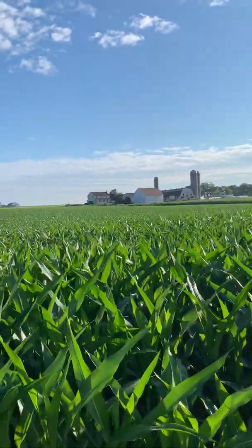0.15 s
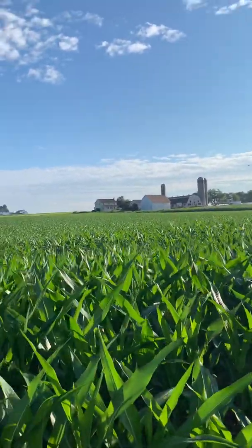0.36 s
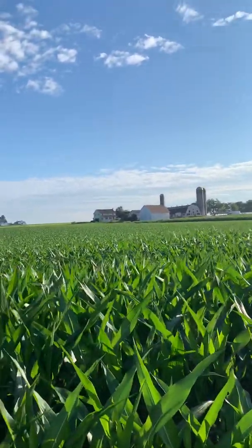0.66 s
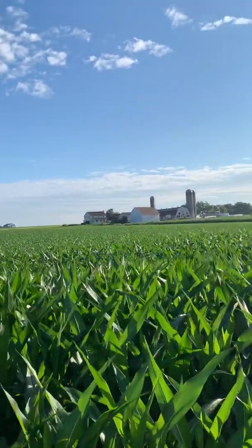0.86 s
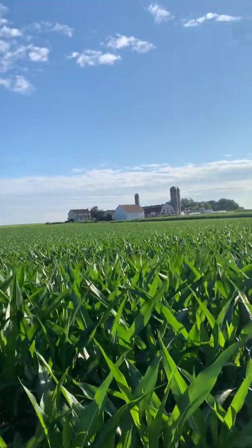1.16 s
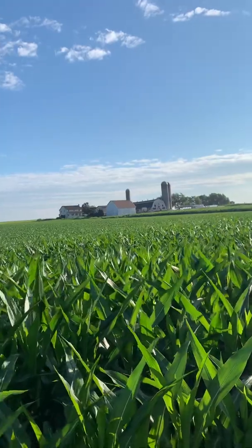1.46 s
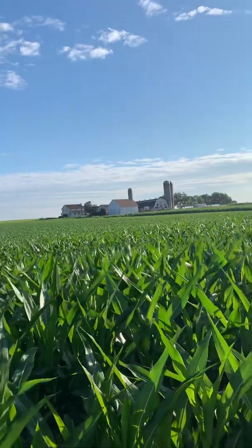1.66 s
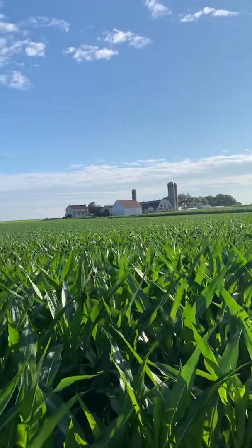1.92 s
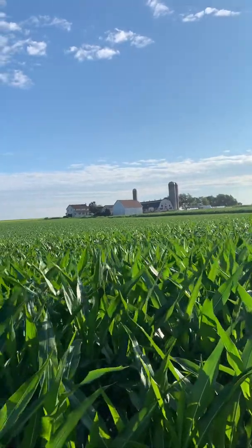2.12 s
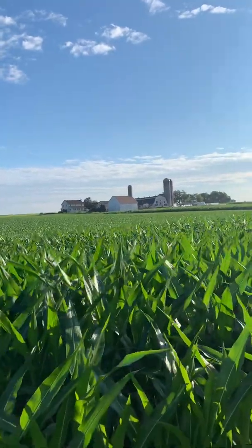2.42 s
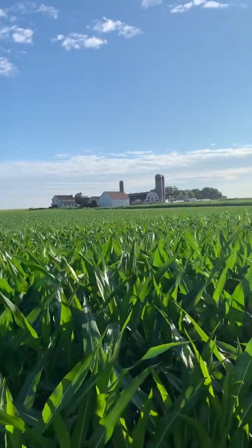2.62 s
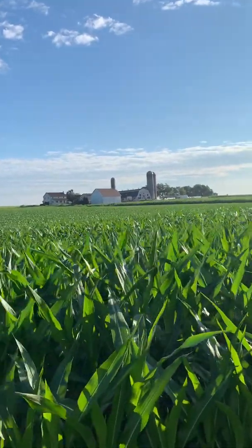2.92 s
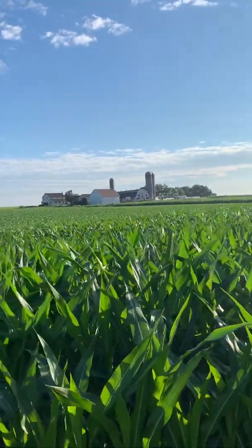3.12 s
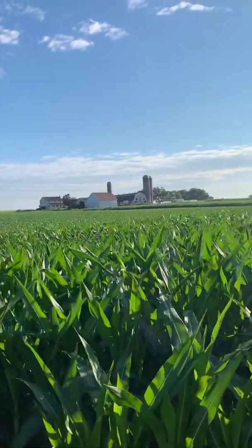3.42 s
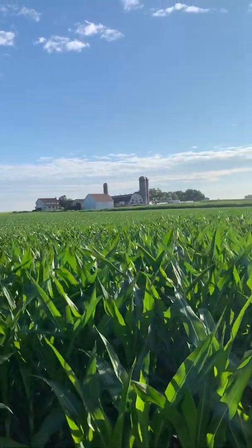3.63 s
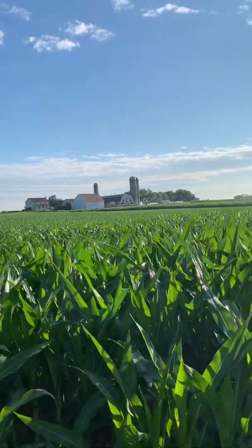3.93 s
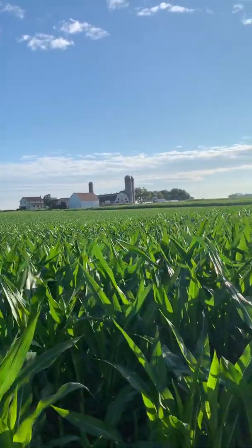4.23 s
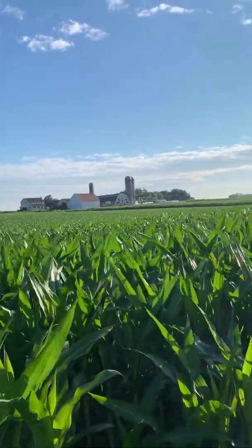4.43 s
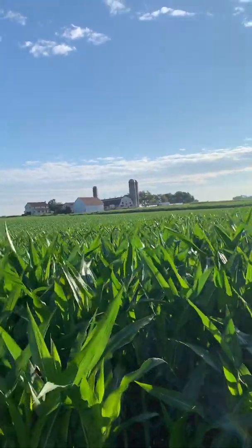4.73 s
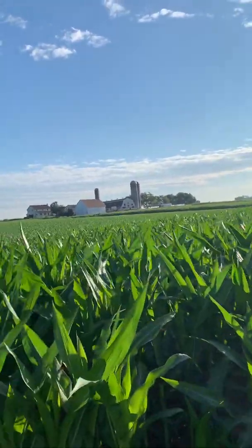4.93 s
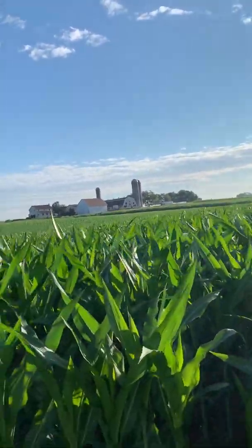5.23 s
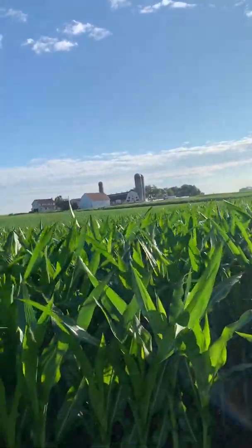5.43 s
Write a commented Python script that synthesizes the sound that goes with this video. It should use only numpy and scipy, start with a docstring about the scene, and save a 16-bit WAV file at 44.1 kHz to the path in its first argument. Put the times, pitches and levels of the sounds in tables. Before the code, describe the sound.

Small birds chirp, whistle and buzz over a breezy maize field, with low wind rumble on the microphone and a soft thud near two seconds.

```python
"""Light wind over a maize field

Two microphone ports take the wind as low noise, each port hearing partly its own, plus damped knocks.
Leaves swish and rustle as coloured noise and tick as very short tones. Birds whistle and chirp with
near-sine notes and buzz with pulsing, raspy tones, all with a short scattered tail. A far engine drones
as one wavering tone, ending just before a thud; a faint cricket trills over a distant noise roar."""
import sys
import numpy as np
from scipy import signal
from scipy.fft import rfft, irfft, next_fast_len
from scipy.io import wavfile
from scipy.ndimage import uniform_filter1d, map_coordinates

SR = 44100
rng = np.random.default_rng(int(sys.argv[2]) if len(sys.argv) > 2 else 0)


def pcm_store(signal):
    """Save signal as 16-bit PCM."""
    levels = np.round(np.clip(np.atleast_2d(signal), -1, 1) * 32767)
    wavfile.write(sys.argv[1], SR, levels.astype(np.int16).T)


N = 245637
T = np.arange(N) / SR

# Wind on the ports: [t/s, rumble level/dB, flutter level/dB]
WIND = [(0.0, -41, -49), (0.1, -48, -54.5), (1.0, -44, -61), (1.3, -41.5, -57.5), (1.5, -44, -56),
        (1.85, -47.5, -51.5), (1.97, -35.5, -51.5), (2.13, -50.5, -56.5), (2.3, -46, -60.5),
        (3.15, -48, -64), (3.4, -49.5, -56.5), (3.7, -45.5, -57), (3.92, -47, -59.5), (4.7, -48, -56.5),
        (5.45, -45, -57.5), (5.57, -50.5, -61.5)]
# Colours of rumble and flutter: [f/Hz, relative density/dB]
RUMBLE_TONE = [(18, -33.5), (28, -13), (42, -2), (62, 8), (80, 1.5), (105, 1), (140, -10), (200, -25),
               (300, -85)]
FLUTTER_TONE = [(70, -17), (120, 3.5), (180, -1), (270, -9), (420, -11), (600, -54.5)]
# Puffs of air knocking a port, and the thud: [t/s, level/dB, f/Hz, t60/s]
KNOCKS = [(0.31, -32, 184, 0.034), (0.596, -40, 181, 0.043), (1.859, -41.5, 334, 0.034),
          (1.977, -24, 144, 0.096), (2.0, -25, 49, 0.1), (3.151, -44.5, 324, 0.041),
          (3.352, -32.5, 383, 0.034), (4.391, -39, 356, 0.026), (4.763, -38.5, 406, 0.035),
          (4.843, -36.5, 204, 0.04), (5.255, -39, 205, 0.07)]

# Brushes of leaves: [start t/s, hold/s, level/dB]
SWISHES = [(0.049, 0.078, -56), (.22, 0.011, -66), (.48, 0.0041, -74), (.77, 0.054, -61.5),
           (.93, .0, -71.5), (1.19, 0.073, -71), (1.39, .0, -67.5), (1.481, 0.094, -60.5),
           (2.24, 0.036, -68), (2.51, 0.017, -69.5), (2.6, 0.019, -74), (2.96, 0.054, -62.5),
           (3.06, 0.011, -66.5), (3.19, .0, -74), (3.71, 0.019, -62), (3.99, 0.027, -72.5),
           (4.33, 0.073, -61.5), (4.44, 0.044, -65.5), (4.58, 0.024, -71.5), (4.67, .0, -69.5),
           (5.09, 0.036, -60.5), (5.41, 0.052, -62.5)]
SWISH_RISE_DB_S, SWISH_FALL_DB_S, SWISH_REST_DB = 231, 249, -80.5
# Colour of the swish: [f/Hz, relative density/dB]
SWISH_TONE = [(800, -25.5), (1500, 7.5), (2500, 3), (4000, -1), (5500, -3), (7000, -0.5), (9000, -8),
              (11000, -7), (13500, -3), (15200, -19.5)]
# Small uneven rustles: [t/s, level/dB]
RUSTLE = [(0, -65), (1.5, -67), (3.4, -66.5), (3.9, -66), (4.7, -62), (5.57, -65.5)]
# Colour of the rustles: [f/Hz, relative density/dB]
RUSTLE_TONE = [(350, -31), (600, -6.5), (1200, -2), (2000, -1), (2800, 0.5), (4000, -1.5), (5200, -3.5),
               (6000, -32.5)]
# Stiff leaves ticking: [t/s, level/dB, f/Hz, bell half-width/s, left lead/rad]
TICKS = [(0.282, -50, 4500, 0.00028, 2.1), (0.55, -62, 4300, 0.00017, 3.1), (0.61, -64, 1316, 0.00089, 2.8),
         (0.911, -59, 5060, 0.00029, 2.9), (0.99, -63, 1203, 0.0005, 2.9),
         (1.094, -38.5, 2445, 0.00022, 1.3), (2.463, -37, 2170, 0.00035, 1.5),
         (3.25, -69, 5200, .0004, 2.8), (3.75, -60, 2200, 0.00023, 2.5), (3.905, -42.5, 2130, 0.00043, 2.3),
         (4.764, -49, 900, 0.0008, 1.7), (5.331, -36, 2240, 0.00031, 1.57)]

# Figures that birds repeat, as lists of notes: [t after cue/s, f/Hz, level against the figure/dB]
CHIRRUP = [
    [(-.013, 4200, -13), (-.007, 4900, -16), (0, 5480, -7), (.012, 4780, -1), (.022, 4500, 0),
     (.03, 4520, -1), (.041, 3350, -6)],
    [(.041, 4650, -15), (.056, 3100, -13)],
]
CHIRRUP_END = [
    [(.066, 3360, -1), (.077, 3170, 0), (.087, 3300, -1), (.092, 3550, -7), (.097, 2900, -6),
     (.105, 2600, -10)],
]
TSIP = [
    [(0, 6000, 3), (.006, 8000, -3), (.018, 8330, -1), (.032, 8420, -13)],
]
PHRASE = [
    [(-.034, 4250, -9), (-.005, 4180, -10)],
    [(0, 4200, -3), (.012, 4240, 1), (.026, 4200, 0), (.047, 3100, -3)],
    [(.032, 4230, -11), (.054, 4240, -11)],
    [(.082, 2280, -14), (.104, 2740, -5)],
]
DROP = [
    [(-.01, 4200, -11), (.006, 3300, -13)],
]  # a steep down-stroke inside the phrase
WARBLE = [
    [(0, 4100, -8), (.007, 4620, -1), (.015, 4930, -4), (.023, 5000, -10), (.031, 5050, -11),
     (.038, 4020, 0), (.047, 4130, -2)],
    [(.055, 3380, -5), (.061, 3650, 0), (.068, 3760, 0), (.075, 4550, -9), (.082, 3450, -3),
     (.087, 3700, -6), (.093, 3050, -6), (.098, 3320, -9), (.103, 2950, -7), (.108, 3250, -10),
     (.114, 2900, -10), (.125, 2750, -14)],
]
SWOOP = [
    [(-.017, 3800, -8), (-.008, 2950, -3), (0, 2630, 0), (.013, 2880, -3), (.018, 3800, -12),
     (.023, 4900, -10)],
]
SWOOP_TOP = [
    [(-.011, 6000, -15), (0, 5380, -12), (.03, 5420, -24)],
]  # overtone of the swoop
TUMBLE = [
    [(-.008, 4300, -9), (0, 5050, -3), (.009, 4300, -8), (.016, 4120, 0), (.027, 3950, -6),
     (.034, 3080, -2)],
    [(.062, 3300, -3), (.07, 3700, -12), (.08, 3230, 0)],
]
# When each figure is sung: [cue t/s, level/dB]
CHIRRUPS = [(0.619, -51), (1.435, -59), (2.284, -54), (3.646, -55), (4.257, -53.5), (4.922, -51.5)]
TSIPS = [(1.878, -74), (2.093, -65.5), (2.306, -69.5), (2.513, -67.5)]
PHRASES = [(1.95, -65), (2.167, -54), (2.38, -57), (2.589, -52)]
WARBLES = [(2.84, -45.5), (5.459, -47.5)]
SWOOPS = [(3.957, -59), (4.19, -53)]
TUMBLE_CUE_S, TUMBLE_DB = 1.041, -62.5
# Lead of each figure or part of a figure, and of the peeps, at the left port, in radians
CHIRRUP_LEAD, CHIRRUP_END_LEAD, TSIP_LEAD, PHRASE_LEAD, DROP_LEAD = 2.75, 2.8, 1.33, 2.5, 1.
WARBLE_LEAD, SWOOP_LEAD, SWOOP_TOP_LEAD, TUMBLE_LEAD, PEEP_LEAD = 2.95, 2.6, 4.1, .6, .45
LEAD_DROP_PER_KHZ, LEAD_KNEE_HZ = 1.3, 4700  # a note's lead shrinks over the 1 kHz above the knee

# Thin high peeps that scoop up, then fade: [t/s, length/s, top f/Hz, last f/Hz, level/dB]
PEEPS = [(0.443, 0.027, 7540, 7520, -67.5), (0.847, 0.032, 7500, 7600, -63.5),
         (1.106, 0.11, 7600, 7390, -58.5), (1.333, 0.05, 7380, 7350, -78),
         (1.517, 0.093, 7640, 7580, -52.5), (1.732, 0.065, 7600, 7630, -76.5)]
SCOOP_S, SCOOP_HZ = 0.019, 333
PEEP_START_DB, PEEP_END_DB = -14.5, -10  # against the middle
# Single gliding whistles: [t/s, length/s, first f/Hz, last f/Hz, level/dB, left lead/rad]
WHISTLES = [(0.0, 0.024, 3000, 3350, -57, 3.2), (0.505, 0.105, 3290, 3330, -59, 3.2),
            (0.7, 0.045, 3340, 3420, -63, .6), (0.763, 0.05, 3350, 3330, -68, 1.12),
            (0.903, 0.04, 3300, 3190, -53, 2.9), (0.947, 0.016, 3530, 3700, -65, 0.88),
            (0.925, 0.105, 3230, 3306, -53.5, 2.7), (1.101, 0.087, 3240, 3320, -62.5, 1.3),
            (1.218, 0.014, 5430, 5180, -67, 3.6), (1.31, 0.054, 2196, 2210, -65, 1.7),
            (1.391, 0.05, 2205, 2240, -66, 1.3), (1.703, 0.068, 2240, 2230, -62.5, 2),
            (2.358, 0.0083, 3510, 2770, -68, 3.7), (2.805, 0.043, 6300, 6900, -71, 0.1),
            (2.818, 0.014, 5850, 6050, -64, 2.2), (3.883, 0.018, 2550, 2640, -70, 1.),
            (3.935, 0.035, 5350, 4620, -56, 3.6), (3.965, .035, 2600, 2590, -69, 1.),
            (4.097, 0.04, 2950, 2300, -67, 2.6), (4.212, 0.052, 2970, 2680, -62, 3.7),
            (4.344, 0.06, 3000, 2440, -57, 1.93), (4.465, 0.018, 3250, 3300, -66, 1.),
            (4.506, 0.02, 2100, 1580, -56, 2.44), (4.513, 0.1, 2330, 2490, -68.5, .5),
            (4.677, 0.031, 2100, 1540, -54, 2.6), (4.909, 0.044, 1900, 1470, -60, 2.4),
            (5.182, 0.033, 1650, 1810, -62.5, 1.)]
WHISTLE_EDGE_DB = -8  # start and end against the middle
NOTE_WAVER, NOTE_RASP = .26, .13  # slow and quick blur that the air puts on a note
CLEAN_ABOVE_HZ, CLEAN_SHARE = 6800, .4  # the high notes come from close by: less blur and tail
TAIL_DB, TAIL_T60_S, TAIL_ALONE = -37, .15, .7  # scattered tail; weight of each port's own part

# Buzzy calls: [t/s, length/s, first f/Hz, middle f/Hz, last f/Hz, width/Hz, pulse rate/Hz, level/dB]
BUZZES = [(0, 0.2, 4400, 4270, 3920, 700, 126, -57), (0.585, 0.045, 4900, 4900, 4900, 1700, 150, -63),
          (2.279, 0.19, 4150, 4370, 4090, 1310, 160, -52),
          (2.635, 0.23, 4430, 4030, 3490, 1260, 143, -52.5),
          (3.302, 0.034, 3100, 2980, 2880, 600, 130, -50.5),
          (3.945, 0.052, 7700, 7100, 6960, 905, 140, -60.5),
          (3.983, 0.094, 7200, 7250, 7300, 700, 130, -71.5), (3.96, 0.07, 5900, 6100, 6050, 1000, 150, -63),
          (4.075, .075, 6300, 6900, 7700, 1500, 150, -68), (4.135, .085, 7900, 7700, 8100, 1900, 150, -69),
          (1.03, .06, 5000, 4300, 3300, 1200, 150, -65), (1.425, .06, 5300, 4500, 3700, 1200, 150, -65),
          (4.061, 0.046, 4110, 4000, 3880, 500, 160, -56), (4.092, 0.045, 3300, 3390, 3630, 900, 150, -51),
          (4.143, 0.046, 3860, 4100, 3970, 400, 210, -48.5),
          (4.201, 0.025, 4000, 4150, 4080, 500, 170, -50), (4.345, 0.16, 4110, 4185, 4080, 710, 124, -52.5),
          (4.385, 0.063, 4560, 4750, 4700, 700, 100, -59),
          (1.455, 0.065, 4100, 3930, 3970, 350, 100, -58.5), (5.034, .04, 3820, 3980, 4160, 400, 140, -57),
          (5.092, 0.074, 3670, 3590, 3800, 400, 140, -58.5)]
BUZZ_SWING, BUZZ_RASP = .24, .6  # pitch swing and rasp bandwidth, as shares of the width
BUZZ_CLEAR, BUZZ_HOARSE = .33, .36  # clear voice and rasp in the mix
BUZZ_DEPTH, BUZZ_BEAT_JITTER = .1, .6  # level throb; scale of the pulse unevenness
BUZZ_START_DB, BUZZ_END_DB = -1.5, -2.5  # against the middle
BUZZ_UNEVEN_DB = 3  # RMS of the swell along a buzz
# Left lead in radians, and likeness of the rasp at both ports (0-1)
BUZZ_LEAD, BUZZ_ALIKE = 1.2, .5
HIGH_BUZZ_HZ, HIGH_BUZZ_LEAD, HIGH_BUZZ_ALIKE = 6500, .3, .85

# Far engine: [t/s, f/Hz, level/dB]
DRONE = [(0.2, 78.6, -61), (0.394, 81.1, -40), (0.46, 78.7, -51), (0.5, 80.26, -41.5), (0.75, 81.5, -49.5),
         (1.0, 83.44, -45), (1.7, 89.27, -42.5), (1.78, 92.2, -45.5), (1.9, 95, -53)]
CRICKET_DB, CRICKET_HZ, CRICKET_RATE_HZ, CRICKET_START_S = -80, 5060, 35.0, .013
# Distant roar of leaves and roads: [t/s, level/dB]
ROAR = [(0.0, -57.5), (1.0, -55.5), (1.6, -57), (3.15, -56.5), (3.5, -58), (4.5, -58), (4.7, -60.5),
        (5.57, -61)]
# Colour of the roar: [f/Hz, relative density/dB]
ROAR_TONE = [(250, -6), (450, -5), (650, 2.5), (950, 5), (1600, -5), (2600, -11), (4500, -15), (5600, -28),
             (7000, -32), (9000, -36.5), (11000, -60), (13500, -37.5), (15200, -53)]

# The two ports: [f/Hz, left lead/rad, likeness of noise 0-1]
PORTS = [(30, 0, .995), (45, 0, .97), (65, .2, .78), (90, .6, .6), (130, 1.4, .35), (200, .6, .35),
         (300, 2.2, .2), (450, 2.9, .5), (700, 3.1, .88), (1000, 2.6, .8), (1400, 2.2, .55),
         (2000, 2.8, .5), (2800, 3.4, .84), (4000, 3.2, .6), (5000, 3.2, .9), (6000, 4.0, .5),
         (6900, 6.3, .95), (7500, 6.5, .93), (8200, 7.6, .75), (9100, 9.2, .9), (9500, 9.4, .985),
         (10300, 9.45, .985), (11000, 10.9, .45), (11900, 12.55, .96), (12900, 12.7, .9),
         (13800, 14.6, .55), (14400, 15.7, .99), (15700, 15.7, .99)]
BASS_CUT_HZ, TOP_HZ = 32, 15700
LEFT_RIGHT = np.array([[1], [-1]])


def undb(db):
    """Decibels to amplitude."""
    return 10 ** (np.asarray(db) / 20)


def curve(rows, at=T):
    """Columns of a table, joined by straight lines."""
    s, *columns = np.transpose(rows)
    return [np.interp(at, s, c) for c in columns]


def on_log(rows, hz):
    """Columns of a spectrum table, joined along log frequency."""
    return curve([(np.log(r[0]), *r[1:]) for r in rows], np.log(hz + 1))


def wander(count, hz):
    """Smooth complex random drift of about that bandwidth, mean power 1."""
    width = max(int(SR / hz), 1)
    z = uniform_filter1d(rng.standard_normal((2, count)), width)
    z = uniform_filter1d(z, width)
    return (z[0] + 1j * z[1]) * np.sqrt(.75 * width)


def sung(rows, fade_s):
    """Sample span, control columns and a soft on-off gate for one sound."""
    start, end = rows[0][0] - fade_s, rows[-1][0] + fade_s
    span = slice(max(int(start * SR), 0), min(int(end * SR), N))
    t = T[span]
    to_edge = np.minimum(t - start, end - t)
    gate = np.sin(np.pi / 2 * np.clip(to_edge / (2 * fade_s), 0, 1)) ** 2
    return span, curve(rows, t), gate


def glide(hz):
    """Complex tone whose phase follows a moving pitch."""
    return np.exp(2j * np.pi * np.cumsum(hz) / SR)


def ports(x):
    """One source reaches the two ports with a phase lead that depends on pitch."""
    size = next_fast_len(N)
    lead = on_log(PORTS, np.arange(size // 2 + 1) * SR / size)[0]
    return irfft(rfft(x, size) * np.exp(.5j * LEFT_RIGHT * lead), size)[:, :N]


def gusty_noise(tone, level_db, patchy_db, patch_s, grain_db, size=1024):
    """Coloured two-port noise: patches of nearby bands swell and fade, short grains lift all bands."""
    hz = np.arange(size // 2 + 1) * SR / size
    frames = 4 * N // size + 5
    patch = rng.standard_normal((40, frames))
    patch = uniform_filter1d(patch, 3, axis=0)
    patch = uniform_filter1d(patch, max(int(4 * patch_s * SR / size), 1), axis=1)
    band = np.log2(np.maximum(hz, 20) / 20) * 3.9  # 3.9 patch bands per octave
    where = np.meshgrid(band, np.arange(frames), indexing="ij")
    patch = map_coordinates(patch / patch.std(), where, order=1)
    gain = undb(on_log(tone, hz)[0][:, None] + patchy_db * patch)

    # Mix noise common to both ports with noise of each port alone
    shared, *alone = rng.standard_normal((3, len(hz), frames, 2)) @ np.array([1, 1j])
    lead, like = on_log(PORTS, hz)
    like = np.clip(like, 0, 1)[:, None]
    turn = np.exp(.5j * LEFT_RIGHT * lead)[:, :, None]
    spectra = gain * (np.sqrt(like) * turn * shared + np.sqrt(1 - like) * np.array(alone))
    both = signal.istft(spectra, nperseg=size, noverlap=3 * size // 4)[1][:, :N]

    grains = np.repeat(rng.exponential(size=N // 64 + 1), 64)[:N]
    both = both * undb(grain_db * uniform_filter1d(grains, size=64))
    return both / both.std() * undb(level_db)


def wind():
    """Air on the ports: deep slow rumble and a quicker, patchier flutter."""
    rumble_db, flutter_db = curve(WIND)
    rumble = gusty_noise(RUMBLE_TONE, rumble_db, 1.82, .15, 0., size=4096)
    flutter = gusty_noise(FLUTTER_TONE, flutter_db, 5.96, .03, 0.24, size=2048)
    return rumble + flutter


def knocks(rise, far_port_db):
    """Damped low rings, stronger at the windward port; the deep thud reaches both alike."""
    out = np.zeros((2, N))
    for s, db, hz, t60 in KNOCKS:
        t = np.maximum(T - s, 0)
        onset = 1 - np.exp(-t / (rise * t60))  # rise is a share of the decay time
        ring = np.sin(2 * np.pi * hz * t) * undb(-60 * t / t60) * onset
        out += undb(db) * ring * undb([[0], [far_port_db * (hz > 100)]])
    return out


def swish_level():
    """Each brush swells, holds and dies away; their powers add over a resting level."""
    power = undb(2 * SWISH_REST_DB)
    for s, held, db in SWISHES:
        before, after = np.maximum(s - T, 0), np.maximum(T - s - held, 0)
        away_db = SWISH_RISE_DB_S * before + SWISH_FALL_DB_S * after
        power = power + undb(2 * (db - away_db))
    return 10 * np.log10(power)


def ticks():
    """A short tone under a bell-shaped push; neighbouring leaves scatter it briefly."""
    out = np.zeros((2, N))
    for s, db, hz, length, lead in TICKS:
        push = np.exp(-((T - s) / length) ** 2)
        out += undb(db) * push * np.cos(2 * np.pi * hz * (T - s) + .5 * lead * LEFT_RIGHT)
    scatter = rng.standard_normal((2, SR // 20)) * undb(-60 * T[:SR // 20] / 0.18)
    return out + undb(-32.5) * signal.fftconvolve(out[1:], scatter)[:, :N]


def small_ticks(per_s, db, spread_db):
    """Leaf tips touching all over the field: damped sines, many faint and a few stronger."""
    when, pitch, size = rng.random((int(per_s * N / SR), 3)).T
    peaks = undb(db - spread_db * np.log(1 - size))
    out = np.zeros(N + 400)
    t = T[:400]
    for s, hz, peak in zip(when, 900 * 4.5 ** pitch, peaks):
        start = int(s * N)
        out[start:start + 400] += peak * np.sin(2 * np.pi * hz * t) * undb(-60 * t / 0.015)
    return ports(out[:N])


def leaves():
    """Brushing leaves as patchy noise, with rustles and ticks on top."""
    swish = gusty_noise(SWISH_TONE, swish_level(), 2.9, .03, 1.1)
    rustle = gusty_noise(RUSTLE_TONE, curve(RUSTLE)[0], 4, .025, 1.2, size=512)
    sparse = small_ticks(per_s=27, db=-56.5, spread_db=1.5)
    dense = small_ticks(per_s=100, db=-70, spread_db=2.0)
    return swish + rustle + ticks() + sparse + dense


def birds():
    """Near-sine notes blurred by the air, and buzzes; leaves and ground scatter a short tail."""
    out = buzzes()
    wet = out[0].copy()
    for rows, lead in notes():
        span, (hz, db), gate = sung(rows, .004)
        far = CLEAN_SHARE if hz.mean() > CLEAN_ABOVE_HZ else 1
        tone = glide(uniform_filter1d(hz, size=90))
        rasp = np.array([wander(len(hz), hz=500) for _ in range(2)])  # separate at each port
        blur = 1 + far * (NOTE_WAVER * wander(len(hz), hz=90) + NOTE_RASP * rasp)
        if far == 1:
            lead = lead - LEAD_DROP_PER_KHZ * np.clip(hz - LEAD_KNEE_HZ, 0, 1000) / 1000
        sides = np.exp(.5j * lead * LEFT_RIGHT)
        note = np.sqrt(2) * undb(db) * gate * (tone * blur * sides).imag
        out[:, span] += note
        wet[span] += far * note[0]
    shared, *alone = rng.standard_normal((3, SR // 5)) * undb(-60 * T[:SR // 5] / TAIL_T60_S)
    tail = shared * LEFT_RIGHT + TAIL_ALONE * np.array(alone)
    return out + undb(TAIL_DB) * signal.fftconvolve(wet[None], tail)[:, :N]


def notes():
    """Every note as pitch and level breakpoints, with its lead at the left port."""
    for figure, cues, lead in [
            (CHIRRUP, CHIRRUPS, CHIRRUP_LEAD), (CHIRRUP_END, CHIRRUPS, CHIRRUP_END_LEAD),
            (TSIP, TSIPS, TSIP_LEAD), (PHRASE, PHRASES, PHRASE_LEAD), (DROP, PHRASES, DROP_LEAD),
            (WARBLE, WARBLES, WARBLE_LEAD), (SWOOP, SWOOPS, SWOOP_LEAD),
            (SWOOP_TOP, SWOOPS[1:], SWOOP_TOP_LEAD),
            (TUMBLE, [(TUMBLE_CUE_S, TUMBLE_DB)], TUMBLE_LEAD)]:
        for s, db in cues:
            for note in figure:
                yield np.add(note, (s, 0, db)), lead
    for s, length, top, last, db in PEEPS:
        yield [(s, top - SCOOP_HZ, db + PEEP_START_DB), (s + SCOOP_S, top, db),
               (s + (SCOOP_S + length) / 2, (top + last) / 2, db),
               (s + length, last, db + PEEP_END_DB)], PEEP_LEAD
    for s, length, first, last, db, lead in WHISTLES:
        edge = db + WHISTLE_EDGE_DB
        middle = (s + length / 2, (first + last) / 2, db)
        yield [(s, first, edge), middle, (s + length, last, edge)], lead


def buzzes():
    """Pitch and level shake at the pulse rate; a clear voice mixes with narrow-band rasp."""
    out = np.zeros((2, N))
    for s, length, first, middle, last, width, rate, top in BUZZES:
        rows = [(s, first, top + BUZZ_START_DB), (s + length / 2, middle, top),
                (s + length, last, top + BUZZ_END_DB)]
        span, (hz, db), gate = sung(rows, .012)
        beat = 2 * np.pi * rate * T[span] + BUZZ_BEAT_JITTER * wander(len(hz), hz=29.0).real
        tone = glide(uniform_filter1d(hz, size=900) + BUZZ_SWING * width * np.cos(beat))

        # The highest buzzes reach both ports more alike
        high = middle > HIGH_BUZZ_HZ
        alike = HIGH_BUZZ_ALIKE if high else BUZZ_ALIKE
        lead = HIGH_BUZZ_LEAD if high else BUZZ_LEAD
        left, right = (wander(len(hz), BUZZ_RASP * width) for _ in range(2))
        right = alike * left + np.sqrt(1 - alike ** 2) * right
        clear = np.exp(.5j * lead * LEFT_RIGHT) * (1 + 0.54 * wander(len(hz), hz=60))
        voice = BUZZ_CLEAR * clear + BUZZ_HOARSE * np.array([left, right])

        db = db + BUZZ_UNEVEN_DB * np.sqrt(2) * wander(len(hz), hz=35).real
        throb = 1 + BUZZ_DEPTH * np.sin(beat)
        out[:, span] += undb(db) * gate * throb * (tone * voice).imag
    return out


def drone():
    """One low firing tone of a far engine, wavering in the air."""
    out = np.zeros(N)
    span, (hz, db), gate = sung(DRONE, 0.05086)
    waver = 1 + 0.5 * wander(len(hz), hz=8.7)
    out[span] = np.sqrt(2) * undb(db) * gate * (glide(hz) * waver).imag
    return ports(out)


def cricket():
    """A far trill at a steady rate: each wing stroke rings one narrow tone."""
    swing = np.cos(2 * np.pi * CRICKET_RATE_HZ * (T - CRICKET_START_S))
    stroke = np.maximum(swing, 0) ** 0.66
    waver = (1 + 0.35 * wander(N, hz=121)) * (1 + 0.5 * wander(N, hz=3.0))
    tone = np.exp(2j * np.pi * CRICKET_HZ * T) * waver
    return ports(undb(CRICKET_DB) * 2 * stroke * tone.imag)


def roar():
    """Distant leaves and roads merge into one coloured noise."""
    return gusty_noise(ROAR_TONE, curve(ROAR)[0], 2.4, .05, 0.9)


def scene():
    """All layers summed at the two ports."""
    return wind() + knocks(rise=0.12, far_port_db=-10.0) + leaves() + birds() + drone() + cricket() + roar()


def record(dry):
    """The phone cuts the deepest bass and the top."""
    bass_cut = signal.butter(4, BASS_CUT_HZ, "high", fs=SR, output="sos")
    top_cut = signal.ellip(12, .2, 80, TOP_HZ, fs=SR, output="sos")
    return signal.sosfilt(top_cut, signal.sosfilt(bass_cut, dry))


dry = scene()
out = record(dry)
pcm_store(out)
```